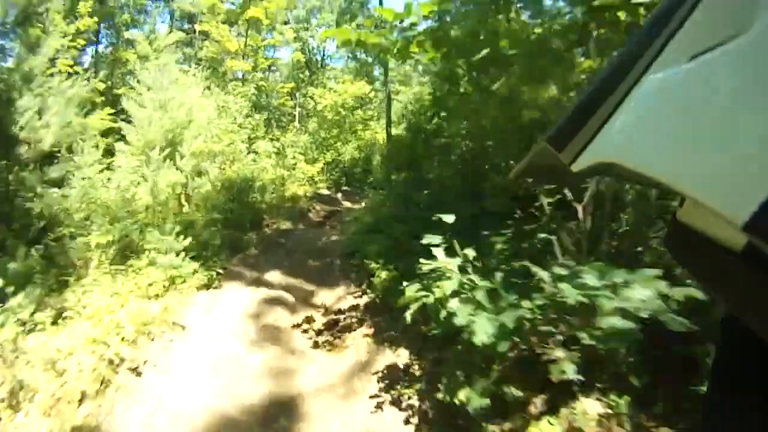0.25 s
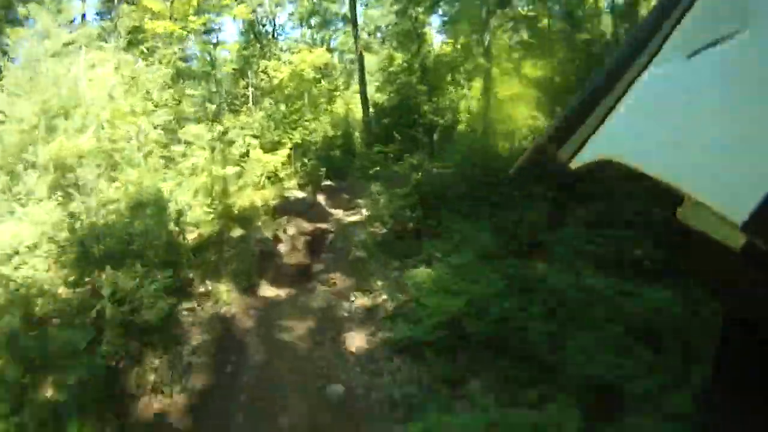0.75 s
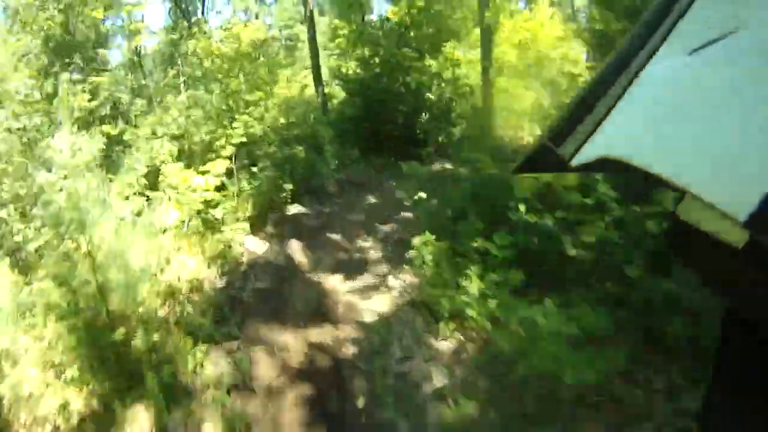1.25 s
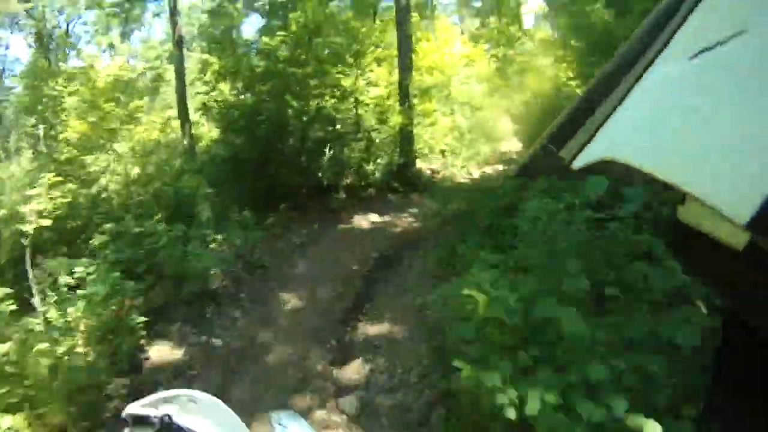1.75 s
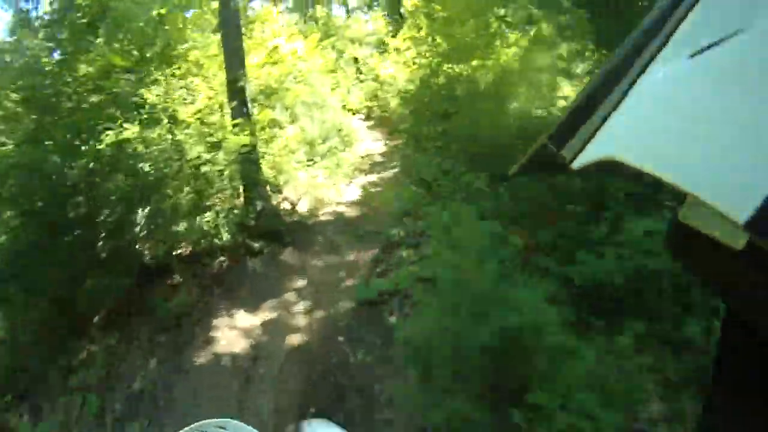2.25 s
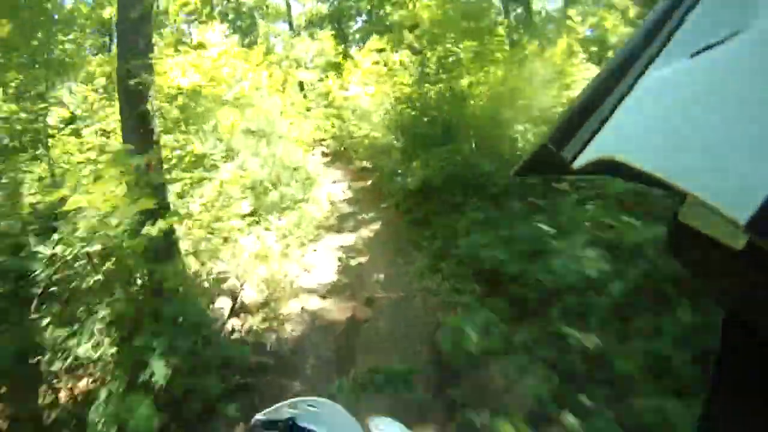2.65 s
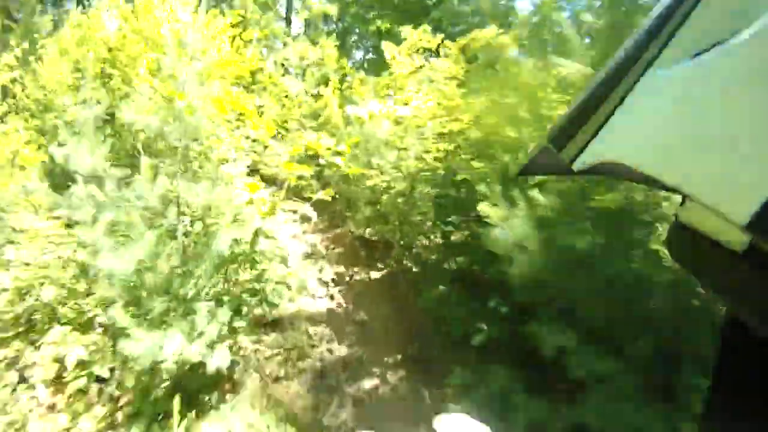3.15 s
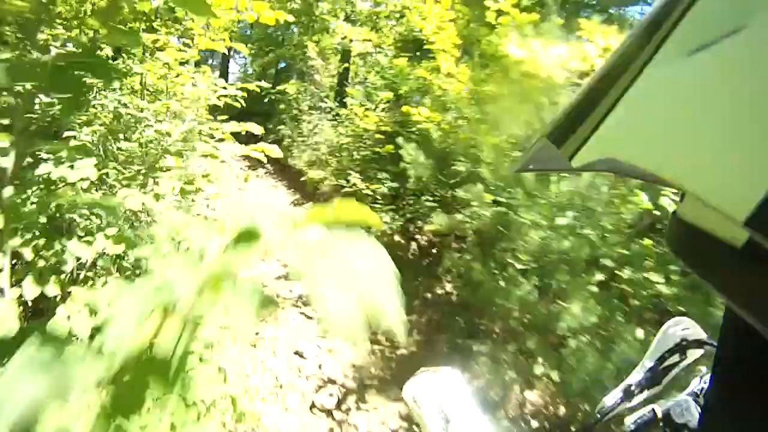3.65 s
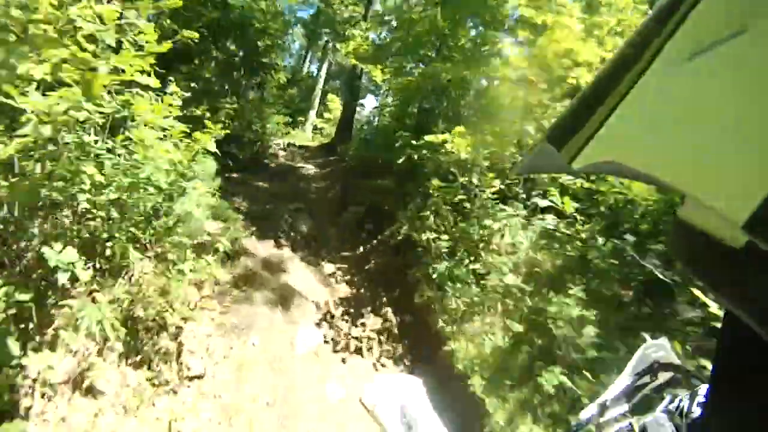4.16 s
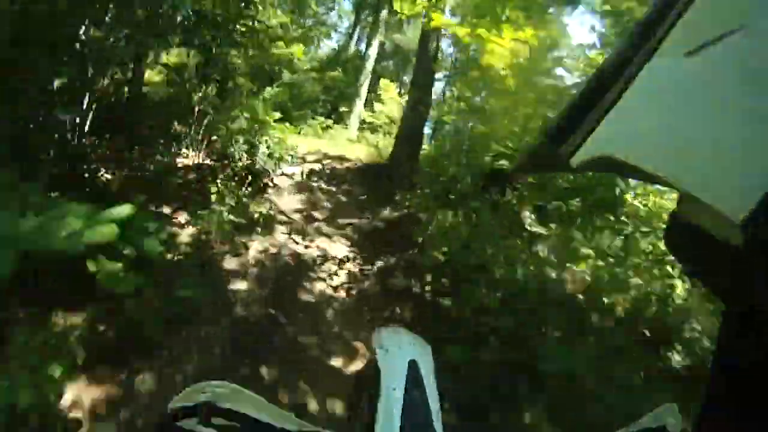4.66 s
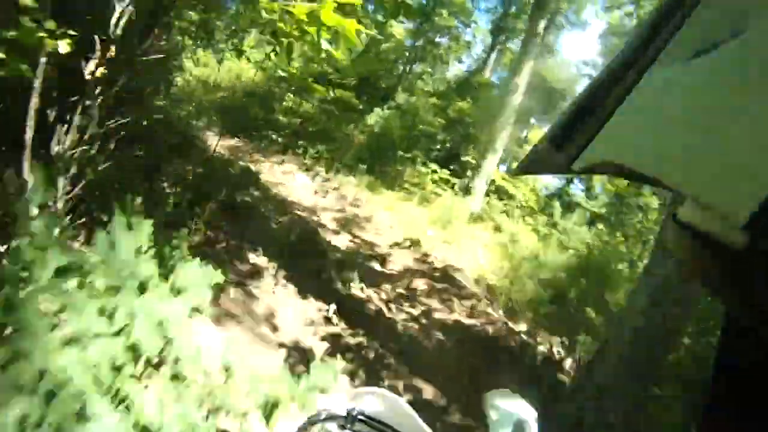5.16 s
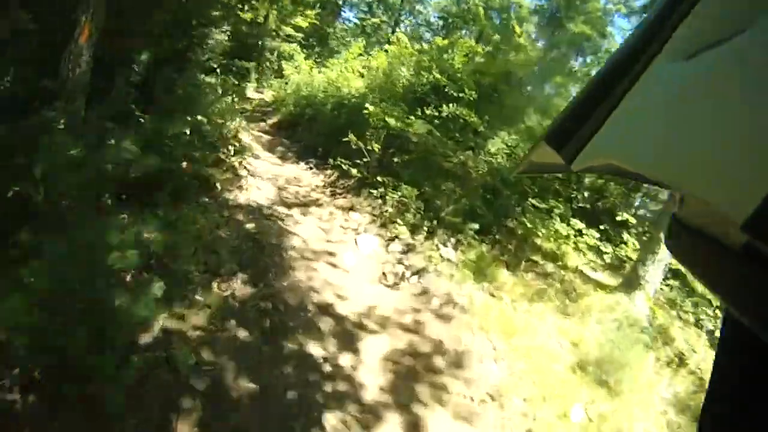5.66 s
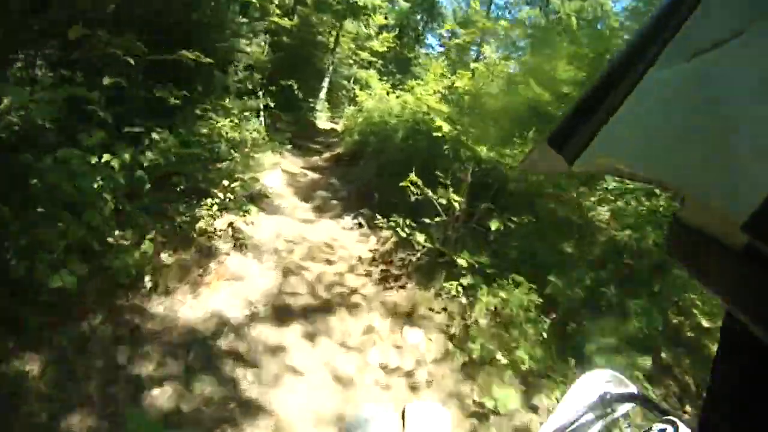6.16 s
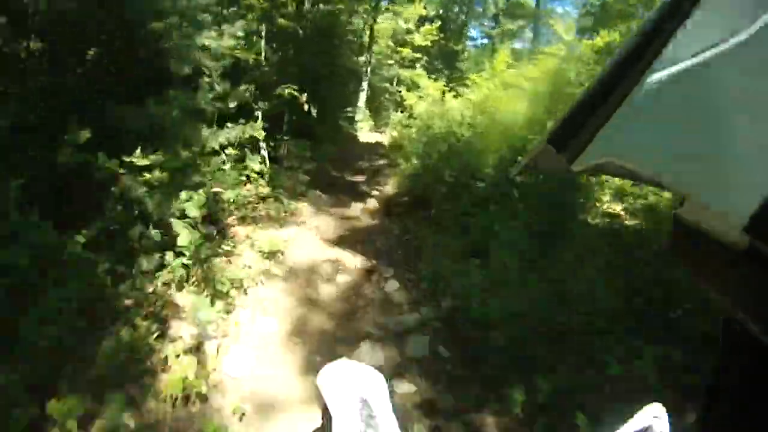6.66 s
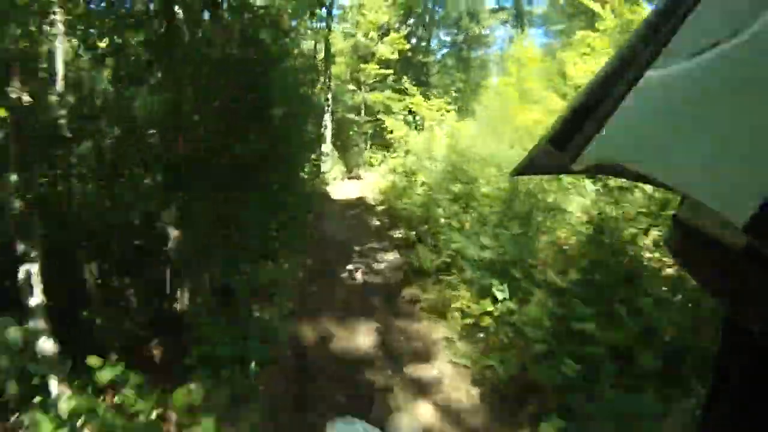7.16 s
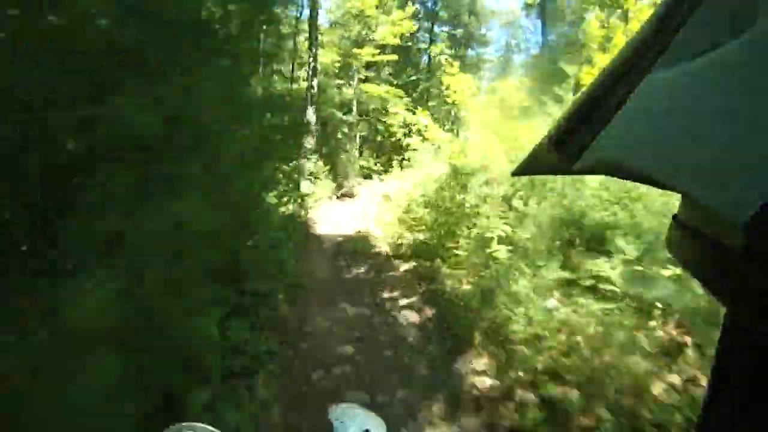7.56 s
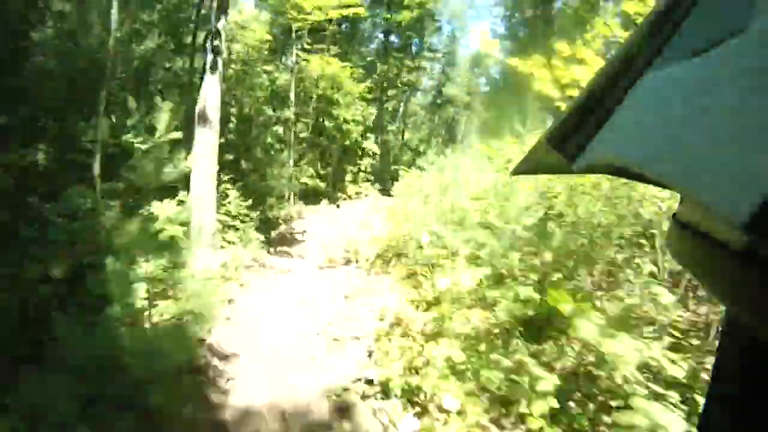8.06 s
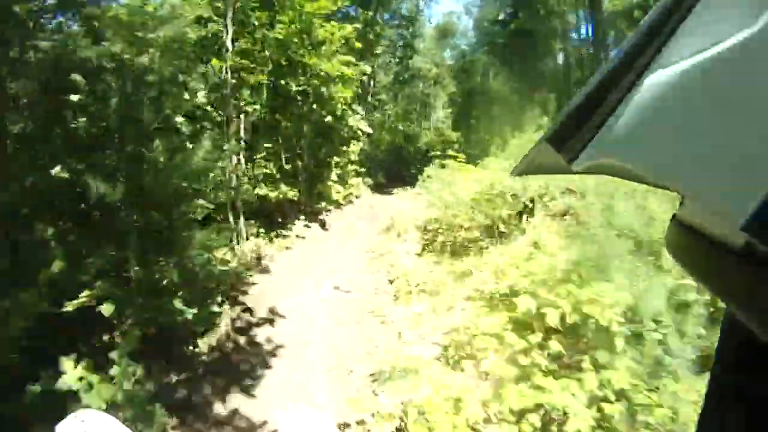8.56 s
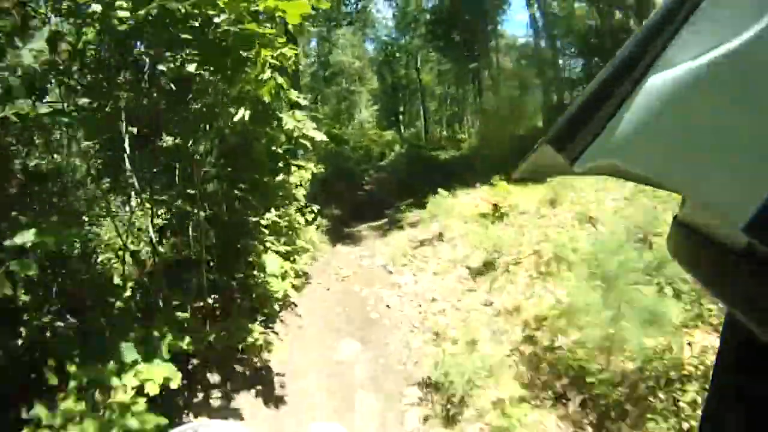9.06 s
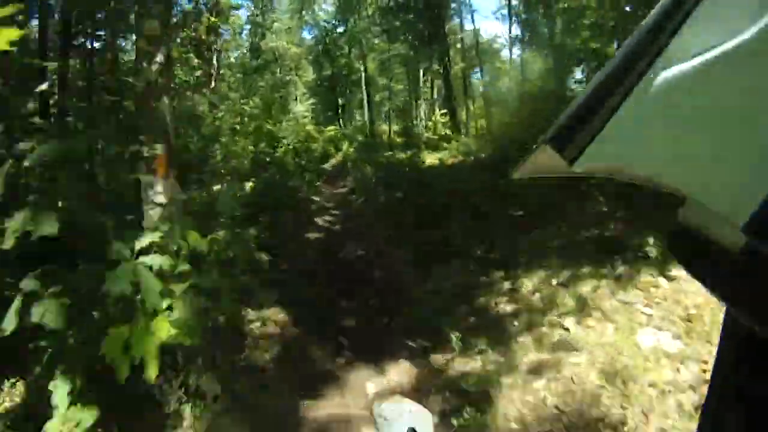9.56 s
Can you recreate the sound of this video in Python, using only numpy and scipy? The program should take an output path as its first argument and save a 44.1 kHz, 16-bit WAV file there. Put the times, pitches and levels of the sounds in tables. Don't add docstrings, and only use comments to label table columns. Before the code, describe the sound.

A small two-stroke bike rolls over rough woodland ground, revving in raspy bursts, with two sharp branch knocks against the rider's helmet.

```python
import sys
import numpy as np
from scipy import signal
from scipy.fft import rfft, irfft
from scipy.io import wavfile
from scipy.ndimage import uniform_filter1d

SR = 44100
rng = np.random.default_rng(int(sys.argv[2]) if len(sys.argv) > 2 else 0)


def master(y):
    cut = np.clip(np.atleast_2d(y).T, -1, 1)
    pcm = np.round(cut * 32767)
    wavfile.write(sys.argv[1], SR, pcm.astype(np.int16))


def convert_level_to_amplitude(level_db):
    exponent = np.asarray(level_db, float) / 20
    return 10 ** exponent


N = 432180
TIME = np.arange(N) / SR


def evened(x):
    return x / np.sqrt(np.mean(x ** 2) + 1e-20)


def add(mix, s, sound):
    part = mix[round(s * SR):][:len(sound)]
    part += sound[:len(part)]


def coloured(x, points, tilt_db=0.):
    hz = np.fft.rfftfreq(len(x), 1 / SR) + 1
    f, db = np.transpose(points)
    db = np.interp(np.log(hz), np.log(f), db + tilt_db * np.log2(f / 3000), -120, -120)
    return evened(irfft(rfft(x) * convert_level_to_amplitude(db), len(x)))


def resonate(x, hz, width):
    turn = np.exp(2j * np.pi * np.cumsum(hz * np.ones(len(x))) / SR)
    r = np.exp(-np.pi * width / SR)
    return 2 * (turn * signal.lfilter([(1 - r) ** 2], [1, -2 * r, r * r], x / turn)).real


def trailing(x, s):
    r = np.exp(-1 / (s * SR))
    return signal.lfilter([1 - r], [1, -r], x)


def lumps(per_s):
    count = int(N / SR * per_s) + 2
    return evened(np.interp(TIME, np.linspace(0, N / SR, count), rng.standard_normal(count)))


# time in seconds, firing rate in Hz.
ENGINE_SPEED = [
    [(1.8, 46), (1.91, 49.5), (1.96, 56), (2.0, 67.5), (2.106, 65.6), (2.216, 70.6), (2.312, 62.9),
     (2.36, 56.6)],
    [(2.38, 47.5), (2.632, 53.4), (2.712, 56.6), (2.766, 57.9), (2.862, 58.0), (2.97, 63.7), (3.024, 56.6),
     (3.102, 65.1), (3.23, 67.1)],
    [(3.67, 53.5), (3.816, 61.1), (3.852, 63.6), (3.864, 63.3), (3.88, 61.0)],
    [(3.91, 58.9), (3.934, 57.4), (4.004, 58.9), (4.104, 66.3), (4.17, 57.6), (4.296, 66.6), (4.444, 66.9),
     (4.522, 64.5), (4.7, 64.8)],
    [(5.97, 44.5), (6.045, 45.5), (6.085, 55), (6.125, 63.5), (6.158, 69.8), (6.312, 56.7), (6.394, 53.3),
     (6.448, 54.6), (6.54, 53.3)],
    [(6.575, 54), (6.606, 62.7), (6.73, 59.9), (6.916, 66.3), (6.98, 65.6), (7.21, 68.2), (7.284, 65.2),
     (7.62, 67.5), (7.7, 69.7)],
    [(8.94, 56.6), (9.008, 71.8), (9.17, 62.7), (9.282, 67.8), (9.406, 63.9), (9.518, 67.2), (9.584, 70.9),
     (9.682, 73.1), (9.8, 73.3)],
]


def speed():
    return np.interp(TIME + .013, *np.concatenate(ENGINE_SPEED).T)


FIRST_FIRING_S = [1.819, 3.685, 3.927, 5.995, 8.913]


def crank():
    turns = np.cumsum(speed() * (1 + 0.0055 * lumps(per_s=60))) / SR
    first = np.array(FIRST_FIRING_S)
    slip = -np.interp(first, TIME, turns) % 1
    times = np.sort(np.r_[first - .1, first - .02])
    slips = np.repeat(np.r_[slip[0], slip], 2)[1:-1]
    return turns + np.interp(TIME, times, slips)


# opening in seconds, shutting in seconds, pipe level at opening in dB,
# pipe level at shutting in dB, multiple of the firing rate that sings.
THROTTLE_TWISTS = [(1.859, 1.933, -30, -33, 12), (1.948, 2.096, -34, -42.5, 9),
                   (2.112, 2.273, -26.5, -29.5, 8), (2.363, 2.55, -37.5, -35.5, 11),
                   (2.558, 2.636, -36, -35, 11), (2.652, 2.722, -35, -33, 11),
                   (2.717, 2.943, -30, -33.5, 12), (2.956, 3.055, -39.5, -31, 9),
                   (3.061, 3.184, -30, -29, 8), (3.709, 3.808, -37.5, -39, 10),
                   (3.942, 4.076, -34.5, -27, 10), (4.021, 4.214, -28, -28.5, 10),
                   (4.222, 4.467, -29.5, -34.5, 8), (4.494, 4.625, -34.5, -31, 8),
                   (6.001, 6.022, -44, -50, 12), (6.034, 6.12, -36.5, -33.5, 11),
                   (6.122, 6.18, -28, -29.5, 7), (6.2, 6.314, -29.5, -31.5, 8), (6.327, 6.57, -31, -37, 11),
                   (6.581, 6.865, -36.5, -34, 8), (6.87, 7.105, -39, -33.5, 8), (7.176, 7.29, -51, -45, 8),
                   (7.296, 7.331, -54, -38, 8), (7.365, 7.514, -39.5, -47, 8),
                   (7.538, 7.682, -44.5, -52, 8), (8.908, 8.945, -45, -35, 8), (8.957, 9.13, -33.5, -42, 8),
                   (9.142, 9.336, -38, -39.5, 8), (9.403, 9.474, -32.5, -28.5, 9),
                   (9.474, 9.547, -28.5, -27.5, 9), (9.567, 9.787, -28, -35, 8)]
OPEN_DB_PER_S, SHUT_DB_PER_S = 394.5, 282


def throttle():
    pipe_db = np.full(N, -90.)
    for opened, shut, open_db, shut_db, _ in THROTTLE_TWISTS:
        held = np.interp(TIME, [opened, shut], [open_db, shut_db])
        gone = OPEN_DB_PER_S * np.maximum(opened - TIME, 0) + SHUT_DB_PER_S * np.maximum(TIME - shut, 0)
        pipe_db = np.maximum(pipe_db, held - gone)
    for s in FIRST_FIRING_S:
        pipe_db[round((s - .05) * SR):round((s - .001) * SR)] = -90
    return pipe_db


# multiple of the low mode, width in Hz, level in dB.
BASS_MODES = [(.25, 41.8, -20.5), (.76, 45, -7)]
# multiple of the upper mode, width in Hz, level in dB.
UPPER_MODES = [(0.8, 121, 9.5), (.94, 60.2, 12.5), (1.07, 57.6, 13.5), (1.2, 89.3, 8.5), (1.4, 110, 3),
               (1.65, 131, -2.5)]
# low mode in Hz, next mode in Hz, next mode in dB,
# upper modes in dB, singing in dB.
PIPE_TUNING = [(238.3, 339, 0, 2.5, 2), (275, 335, -3, -1.5, 1), (268, 335, -6, -6, -1),
               (259, 299, 2, 10.5, 3), (258, 315, 0, 8.5, 7.5), (228, 282, 2, 8, 2),
               (253.5, 345, -5.5, -2, -7.5), (262.5, 320, 4.5, 1.5, -2), (254.7, 322, -6.5, -2, -6.5),
               (242, 310, 2.5, 1.5, -1), (250, 310, -0.5, 2.5, 4), (280, 336, -7, 1, -11),
               (258, 325, -4, -1, 2.5), (257, 320, -1.5, 0, -2), (256, 337, 6.5, -11, -2),
               (260.4, 330, 1, 9.5, 12), (260, 310, -5, -3.5, -2.5), (276, 296, -1, 1.5, 1.5),
               (260, 357, -1.5, 5, 8.5), (239, 298.5, 3, 0, 5), (252, 328, 1.5, 2.5, 6.5),
               (232, 370, -8, -8, -10), (255, 94, 3, -2, -10), (260, 330, 2.5, 3.5, -5),
               (217, 300, -3.5, -1, -14), (235, 330, -1, 0, -4), (266.5, 333, 0, -5, 1.5),
               (255, 327, 2, 0, -9), (274, 322, 0, -2, -2), (268, 317, 1, -5, -13),
               (277, 339, -0.5, -5.5, 4.5)]
LOW_MODE_HZ, UPPER_MODE_HZ = 271, 568.3
LOW_WIDTH_HZ, NEXT_WIDTH_HZ, RETUNE_S = 53, 54, 0.038
UPPER_DB, UPPER_DB_PER_HZ, COLD_UPPER_DB, UPPER_LATE_S = -13, 0.61, 5.5, 0.004434
ROUGH_WARM, ROUGH_COLD, SETTLE_S = .09, .45, .07
ECHO_S, ECHO_SHARE = 0.0074, 0.05
SING_DB, SING_WIDTH_HZ, SING_WAVER_DB = -15.5, 18, 1.3


def exhaust(pipe_db, turns):
    opened, *_, multiple = np.transpose(THROTTLE_TWISTS)
    twist = np.maximum(np.searchsorted(opened, TIME + .02) - 1, 0)
    singing_hz = speed() * multiple[twist]
    tuning = uniform_filter1d(np.transpose(PIPE_TUNING)[:, twist], round(RETUNE_S * SR))
    low_hz, next_hz, next_db, more_db, sing_db = tuning

    cold = trailing(1. * (pipe_db < -46), SETTLE_S)
    rough = ROUGH_WARM + ROUGH_COLD * cold
    upper_db = more_db + UPPER_DB + UPPER_DB_PER_HZ * (speed() - 60) + COLD_UPPER_DB * cold

    uneven = rng.standard_normal(800)[turns.astype(int)]
    fired = np.diff(np.floor(turns), prepend=0) * convert_level_to_amplitude(6 * rough * uneven)
    puffs = np.exp(-(turns % 1) / .5) * rng.standard_normal(N)
    drive = (1 - rough) * evened(fired) + rough * evened(puffs)
    drive = drive + ECHO_SHARE * np.roll(drive, round(ECHO_S * SR))

    low = np.zeros(N)
    for k, (m, width, db) in enumerate(BASS_MODES):
        low += (-1) ** k * convert_level_to_amplitude(db) * resonate(drive, m * LOW_MODE_HZ, width)
    main = resonate(drive, low_hz, LOW_WIDTH_HZ)
    low = low + convert_level_to_amplitude(8.0) * (main - convert_level_to_amplitude(next_db) * resonate(drive, next_hz, NEXT_WIDTH_HZ))
    low = low - .7 * resonate(low, 132, 69)

    high = sum(convert_level_to_amplitude(db) * resonate(drive, m * UPPER_MODE_HZ, width) for m, width, db in UPPER_MODES)
    high = np.roll(high, round(UPPER_LATE_S * SR))
    sung = resonate(drive, singing_hz, SING_WIDTH_HZ)
    sung_gain = convert_level_to_amplitude(SING_DB + sing_db + SING_WAVER_DB * lumps(per_s=9))
    return convert_level_to_amplitude(pipe_db) * (evened(low) + convert_level_to_amplitude(upper_db) * evened(high) + sung_gain * evened(sung))


# frequency in Hz, width in Hz, level in dB.
CYLINDER_MODES = [(1480, 150, -1), (2000, 190, 0), (2500, 220, -5), (3050, 240, -7), (4750, 200, -11.5),
                  (6100, 250, -18), (6850, 300, -20)]
RATTLE_TURNS, SLAP_DB_PER_HZ = .1, -.3


def slap(turns):
    t = np.arange(700) / SR
    hz, width, db = np.transpose(CYLINDER_MODES)[..., None]
    envelope = t * width * np.exp(-2 * np.pi * width * t)
    ping = (convert_level_to_amplitude(db) * np.sqrt(width) * envelope * np.sin(2 * np.pi * hz * t)).sum(0)
    uneven = rng.standard_normal(800)[turns.astype(int)]
    size = convert_level_to_amplitude(2.5 * uneven + SLAP_DB_PER_HZ * (speed() - 60))
    blows = np.exp(-(turns % 1) / RATTLE_TURNS) * size * rng.standard_normal(N)
    return evened(signal.oaconvolve(blows, ping)[:N])


# frequency in Hz, width in Hz, level in dB.
FIN_MODES = [(1190, 150, -4.5), (1352, 50, -3), (1497, 14, 5.5), (1875, 17, 8.5), (2096, 64, -4),
             (2355, 28, -2), (2470, 34, 6), (2840, 70, -3), (3260, 13, 0), (4200, 66, -23),
             (4780, 51, -15.5), (5300, 57, -17), (6170, 70, -17), (8650, 250, -25.5)]
FIN_SPREAD, FIN_WAVER_DB = .03, 3


def struck_metal(blows):
    t = np.arange(2048) / SR
    hz, width, db = np.transpose(FIN_MODES)[..., None]
    hz = hz * (1 + FIN_SPREAD * rng.standard_normal((3, len(FIN_MODES), 1)))
    modes = convert_level_to_amplitude(db) * np.sqrt(width) * np.exp(-np.pi * width * t) * np.sin(2 * np.pi * hz * t)
    sides = modes.sum(1) * np.clip(t / 0.00066, 0, 1)
    return sum(signal.oaconvolve(blows * convert_level_to_amplitude(FIN_WAVER_DB * lumps(per_s=7)), side)[:N] for side in sides)


# time in seconds, level in dB.
GROUND_SHAKE = [(0.0, -47), (0.25, -45), (0.38, -43), (0.598, -50), (0.946, -48), (1.186, -56),
                (1.79, -52.5), (3.3, -46.5), (3.44, -44), (3.66, -54.5), (4.7, -44.5), (4.906, -50.5),
                (5.96, -53), (7.2, -40), (7.622, -41), (7.822, -44.5), (8.348, -46.5), (8.618, -59.5),
                (9.8, -41.5)]


def ground_db():
    return np.interp(TIME, *np.transpose(GROUND_SHAKE))


# frequency in Hz, level in dB per Hz.
CLATTER_SPECTRUM = [(530, -14), (900, -4.5), (1270, -5), (1490, -4), (1710, -4.5), (1840, -7.5), (2100, -4),
                    (3180, -14.5), (3500, -22), (4550, -36), (7700, -120)]
# frequency in Hz, level in dB per Hz.
HISS_SPECTRUM = [(2060, -31), (3400, -4.5), (3950, -5.5), (4300, -3.5), (4570, -4.5), (4830, -1),
                 (5630, -13), (5980, -6), (6420, -9.5), (6850, -5), (7580, -16), (9060, -10), (9510, -13.5),
                 (10600, -22.5), (13300, -26), (14500, -33)]
LAG_S, SLAP_TURN = 0.021, .65
CLATTER_DB, CLATTER_SHARE, CLATTER_ROLL_DB, CLATTER_ROLL_SHARE = -60, 0.71, -57.5, 0.84
HISS_DB, HISS_SHARE, HISS_ROLL_DB, HISS_ROLL_SHARE = -66, 0.78, -74.5, 0.63
FLUTTER_DB, METAL_DB, PING_DB = 1.5, -4, -4.5


def engine_noise(pipe_db, turns):
    turns = turns + 1 - SLAP_TURN
    idle = trailing(1. * (pipe_db < -50), LAG_S)
    pull = trailing(convert_level_to_amplitude(pipe_db + 32), LAG_S) * (1 - idle) ** 2
    shake = convert_level_to_amplitude(ground_db() + 50 + FLUTTER_DB * lumps(per_s=11))
    clatter_gain = convert_level_to_amplitude(CLATTER_DB) * pull ** CLATTER_SHARE + convert_level_to_amplitude(CLATTER_ROLL_DB) * shake ** CLATTER_ROLL_SHARE
    hiss_gain = convert_level_to_amplitude(HISS_DB) * pull ** HISS_SHARE + convert_level_to_amplitude(HISS_ROLL_DB) * shake ** HISS_ROLL_SHARE

    rattle = convert_level_to_amplitude(1. * lumps(per_s=25) + .6 * lumps(per_s=400))
    rattle = rattle * convert_level_to_amplitude(0.72 * rng.standard_normal(800)[turns.astype(int)])
    swell = np.exp(-(turns % 1) / .3)
    clatter = coloured((1.2 + swell) * rattle * rng.standard_normal(N), CLATTER_SPECTRUM)
    hiss = coloured((1.4 + swell) * rattle * rng.standard_normal(N), HISS_SPECTRUM)

    blows = np.diff(np.floor(turns), prepend=0) * convert_level_to_amplitude(2.2 * rng.standard_normal(N))
    blows = evened(blows) + .55 * rattle * rng.standard_normal(N)
    load = np.clip(pull ** .4, .1, 1.3)
    rung = load * (convert_level_to_amplitude(METAL_DB) * evened(struck_metal(blows)) + convert_level_to_amplitude(PING_DB) * slap(turns))
    return clatter_gain * (clatter + rung) + hiss_gain * hiss


# start in seconds, peak in dB,
# frequency in Hz, 60 dB decay time in seconds.
THUMP_EVENTS = [(0.828, -38, 247, 0.049), (0.931, -53, 92, .2), (0.991, -38, 70.4, 0.14),
                (1.096, -42, 288, 0.23), (1.135, -31, 422, 0.023), (1.209, -40, 295, 0.07),
                (1.218, -38, 403, 0.08), (1.831, -34, 49, 0.21), (3.449, -22.5, 238, 0.41),
                (3.48, -7, 216, 0.045), (3.49, -22.5, 382, 0.075), (3.52, -13, 302, 0.018),
                (3.524, -15.5, 320, 0.031), (3.546, -27, 212, 0.1), (3.56, -22.5, 100, 0.081),
                (4.661, -28, 111, 0.2), (4.739, -38.5, 69.3, 0.34), (4.84, -35.5, 268, 0.15),
                (4.872, -22, 143, 0.018), (4.886, -26, 443, 0.016), (5.189, -39, 237, 0.23),
                (5.49, -37.5, 227, 0.15), (1.499, -47, 294, 0.22), (7.7495, -16.5, 420, 0.064),
                (7.7495, -20.5, 682, 0.052), (8.427, -36, 80.2, .1), (8.468, -25, 85, 0.068),
                (8.507, -26.5, 102, 0.096), (1.094, -39, 65, 0.14), (1.22, -40.5, 653, .05),
                (1.229, -40, 524, 0.044), (1.245, -45, 346, .1), (1.27, -44, 298, 0.046),
                (3.478, -19, 2660, .02), (3.4887, -13.5, 2525, 0.014), (3.489, -14.5, 3080, 0.017),
                (3.555, -31, 4350, 0.017), (3.556, -38, 2400, .03), (3.579, -20, 138, .04),
                (3.595, -28.5, 70, 0.11)]


def thump(db, hz, t60):
    t = np.arange(round(t60 * SR)) / SR
    wander = 1 + .11 * np.sin(2 * np.pi * (.31 * hz * t + rng.random()))
    swing = np.sin(2 * np.pi * hz * np.cumsum(wander) / SR)
    return -np.clip(t / 0.002, 0, 1) * convert_level_to_amplitude(db - 60 * t / t60) * swing


# frequency in Hz, level in dB per Hz.
TWIG_SPECTRUM = [(290, -34), (500, 2), (1510, -7), (1690, -11), (2280, -10), (3120, -12), (3660, -16.5),
                 (4660, -7.5), (5620, -16), (7480, -19.5), (8510, -15.5), (10500, -29), (15300, -33)]
# start in seconds, peak in dB, length in seconds,
# brightness in dB per octave.
SCRAPE_EVENTS = [(3.473, -14.5, 0.0042, 0.5), (3.4785, -1, 0.002, -0.5), (3.481, -11.5, 0.0032, -4.5),
                 (3.486, -11.5, 0.004, 0.5), (3.49, 1.5, 0.0008, -0.5), (3.491, -16, 0.0063, -0.5),
                 (3.4977, -24, 0.0076, -2), (3.5, -22, 0.0275, -2), (3.527, -10.5, 0.0108, -1.5),
                 (3.5384, -3, 0.0003, 2.5), (3.539, -24, 0.003, -1), (3.545, -30, 0.008, -1),
                 (3.553, -25, 0.0105, -0.5), (3.564, -34, 0.018, -3.5), (3.581, -45, 0.022, -1.5),
                 (7.7292, -19.5, 0.01, 3), (7.737, -12, 0.0046, 3.5), (7.743, -8.5, 0.0019, 6.5),
                 (7.745, -3, 0.0016, 7), (7.748, -9, 0.0019, 0), (7.75, -23.5, 0.0051, -2.5),
                 (7.754, -37, 0.012, 3), (8.023, -38.5, 0.035, -1), (8.103, -37, 0.096, -3.5),
                 (8.2973, -21.5, 0.00037, 13), (8.4745, -54.5, 0.0021, 11), (3.45, -26, 0.016, -6),
                 (7.7437, -6.5, .0002, 6), (7.7454, -4, .0002, 7), (7.7492, -3.5, .0002, 9.5)]


def scrape(db, length, tilt_db):
    t = np.arange(4096) / SR - .01
    slips = rng.standard_normal(4096) * convert_level_to_amplitude(2.6 * rng.exponential(1, 4096))
    fall = np.exp(-np.maximum(t - length, 0) / (.0005 + .1 * length))
    shape = np.clip(t / .0005, 0, 1) * fall
    return convert_level_to_amplitude(db - 14.0) * shape * coloured(slips, TWIG_SPECTRUM, tilt_db)


# start in seconds, peak in dB, treble over the peak in dB.
TICK_EVENTS = [(0.6245, -40.5, -10.5), (0.7362, -47, -12), (0.9246, -37.5, -12), (1.0562, -44.5, -11),
               (1.1568, -51, -8), (1.3029, -41.5, -13), (1.3694, -51, -8), (1.517, -48, -11),
               (1.5963, -46, -25), (1.8048, -38.5, -12), (1.8537, -42, -24), (1.8761, -36, -15),
               (1.934, -38, -24), (2.4083, -40, -27), (3.789, -50, -2), (4.6563, -43, -22),
               (4.8549, -42.5, -14), (5.01, -51, -29), (5.1128, -47, -15), (5.165, -45, -32),
               (5.6037, -50, -26), (6.0287, -48, -20), (6.0521, -44, -24), (7.2908, -37, -28),
               (7.5814, -48, -25), (8.3659, -63, -29), (8.449, -69, -10), (8.5525, -51, -15),
               (8.6454, -56, -20), (9.0024, -37, -14), (3.385, -63, -20), (7.32, -41, -5),
               (7.412, -60, -20), (8.948, -49, -12), (1.8985, -44, -24), (1.917, -47, -24),
               (1.952, -37.5, -24), (6.073, -58, -22), (6.09, -41, -22)]


def tick(db, treble_db):
    t = np.arange(1500) / SR
    crack = rng.standard_normal(1500)
    mid = evened(resonate(crack, 2170, 1390))
    bright = evened(resonate(resonate(crack, 4400, 4200), 4400, 4200))
    shape = np.clip(t / 0.00047, 0, 1) ** 2 * np.exp(-t / 0.0075)
    return convert_level_to_amplitude(db - 7.0) * (mid + convert_level_to_amplitude(treble_db) * bright) * shape


# frequency in Hz, level in dB per Hz.
TYRE_SPECTRUM = [(76, -28.5), (130, -0.5), (225, 1), (269, -3), (343, -3), (630, -7.5), (900, -17.5),
                 (1170, -19.5), (1980, -120)]


def tyres():
    return convert_level_to_amplitude(ground_db() + 1.9 * lumps(per_s=100)) * coloured(rng.standard_normal(N), TYRE_SPECTRUM)


# time in seconds, buffet level in dB.
WIND_LEVEL = [(0.0, -60), (0.41, -48), (0.6, -61), (1.01, -46.5), (1.16, -66), (1.58, -56), (2.26, -53),
              (2.67, -51), (3.47, -55.5), (3.66, -58), (4.2, -50.5), (6.0, -53.5), (7.64, -47), (8.16, -56),
              (8.38, -44), (8.68, -55), (9.28, -64.5), (9.8, -51.5)]
# frequency in Hz, level in dB per Hz.
BUFFET_SPECTRUM = [(8.8, -40), (15, -17), (38, 6), (130, -6), (170, -33), (290, -120)]


def wind():
    wind_db = np.interp(TIME, *np.transpose(WIND_LEVEL))
    return convert_level_to_amplitude(wind_db + 0.81 * lumps(per_s=10)) * coloured(rng.standard_normal(N), BUFFET_SPECTRUM)


def scene():
    turns, pipe_db = crank(), throttle()
    mix = exhaust(pipe_db, turns) + engine_noise(pipe_db, turns) + tyres() + wind()
    for s, *row in THUMP_EVENTS:
        add(mix, s, thump(*row))
    for s, *row in SCRAPE_EVENTS:
        add(mix, s - .01, scrape(*row))
    for s, *row in TICK_EVENTS:
        add(mix, s, tick(*row))
    late = np.roll(mix, shift=300)
    spread = convert_level_to_amplitude(-37) * late + convert_level_to_amplitude(-36) * (late - trailing(late, .0003))
    return np.array([mix + spread, mix - spread])


def band_limit(x):
    return signal.sosfilt(signal.butter(12, 15740, fs=SR, output="sos"), x)


# start in seconds, length in seconds, signed kick going in,
# signed kick coming out.
STOP_EVENTS = [(.503, 0.0064, -0.014, -0.047), (3.5385, 0.00074, -0.46, 0.44), (3.541, 0.0012, 0.32, -0.32),
               (4.684, 0.003, 0.011, 0.13), (8.183, 0.0084, -0.0045, 0.064), (8.198, 0.01, -0.078, -0.087),
               (8.215, 0.0081, 0.053, 0.058), (8.285, 0.0078, 0.025, 0.071),
               (8.2979, 0.0105, -0.044, -0.056), (8.3548, 0.0063, -0.034, -0.043),
               (8.39, 0.0061, -0.057, -0.052), (8.482, 0.0094, -0.021, -0.069),
               (8.501, 0.0038, 0.02, 0.016)]


def record(dry):
    passed, kicks = np.ones(N), np.zeros(N)
    u = np.arange(300) / SR / 0.00074
    kick = (u * np.exp(1 - u)) ** 2
    for s, length, going, coming in STOP_EVENTS:
        passed[round((s + .0014) * SR):round((s + length) * SR)] = 0.0039
        add(kicks, s, going * kick)
        add(kicks, s + length, coming * kick)
    add(kicks, 8.2974, -.19 * kick[::2])
    edge = signal.firwin(511, 15250, window=("kaiser", 8), fs=SR)[None]
    heard = signal.oaconvolve(dry * uniform_filter1d(passed, size=30) + kicks, edge, "same")
    return band_limit(heard)


dry = scene()
out = record(dry)
master(out)
```